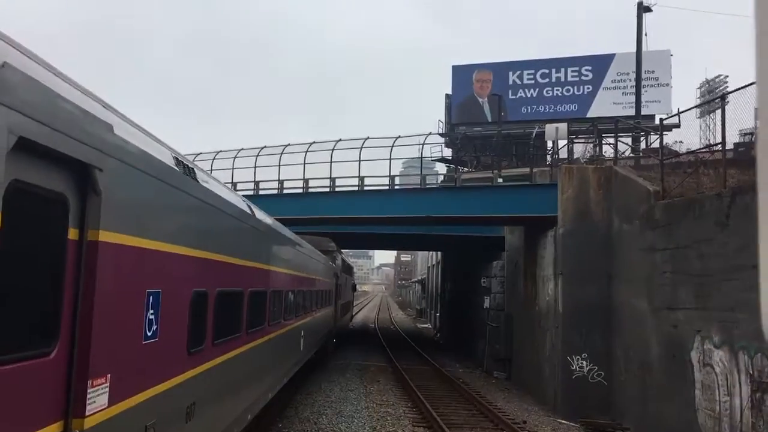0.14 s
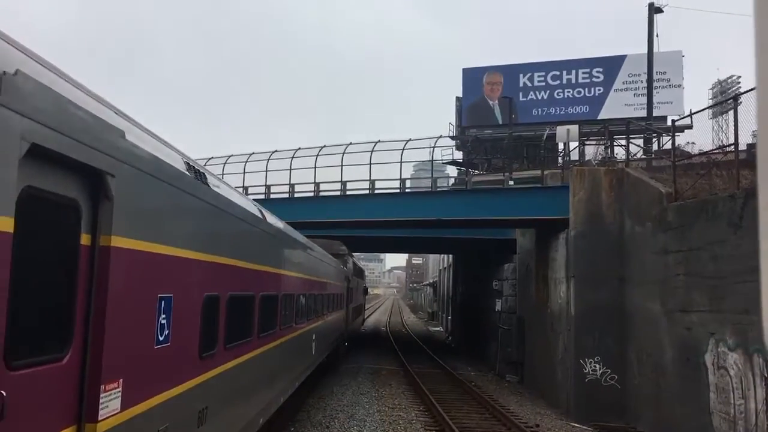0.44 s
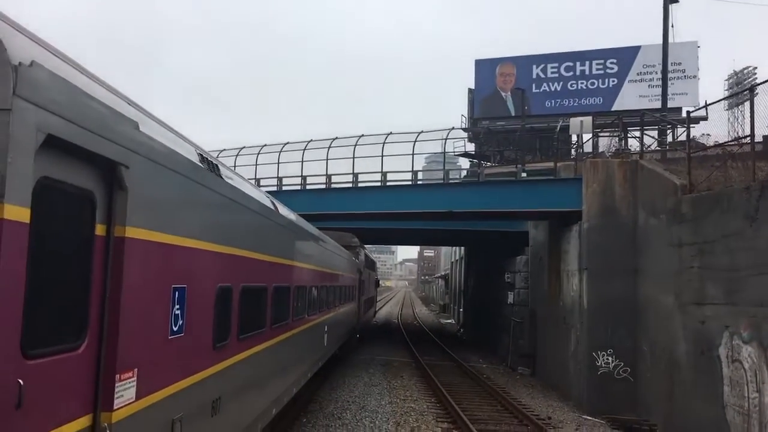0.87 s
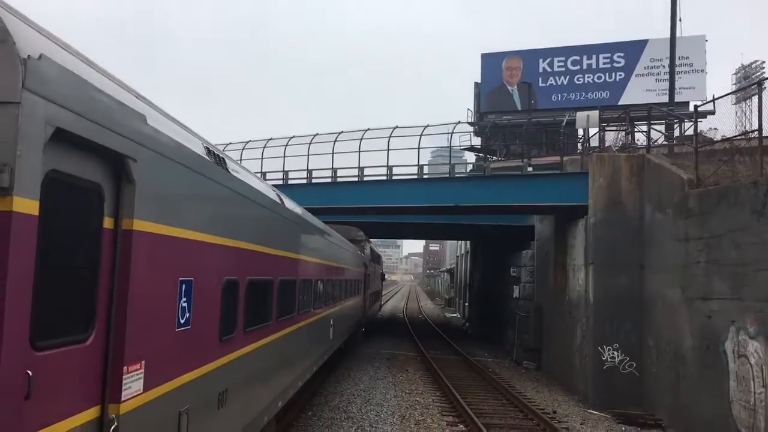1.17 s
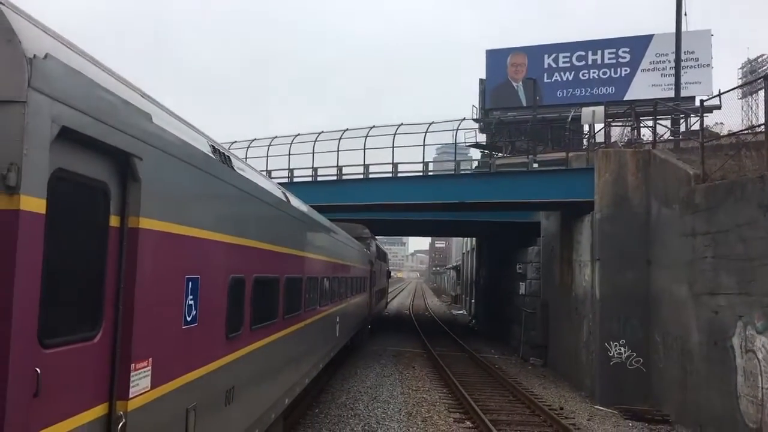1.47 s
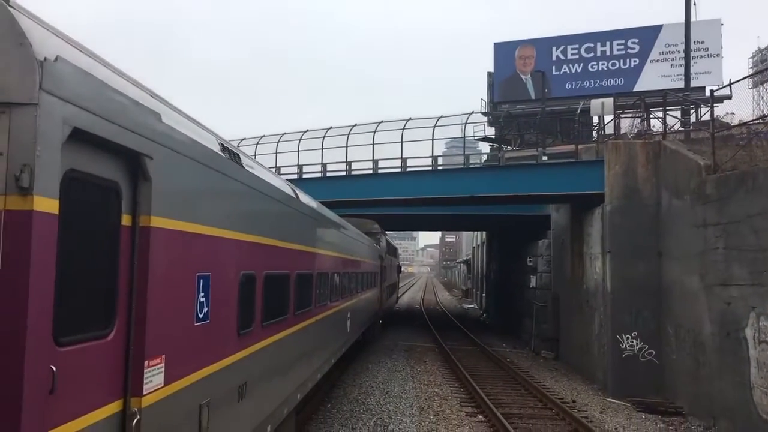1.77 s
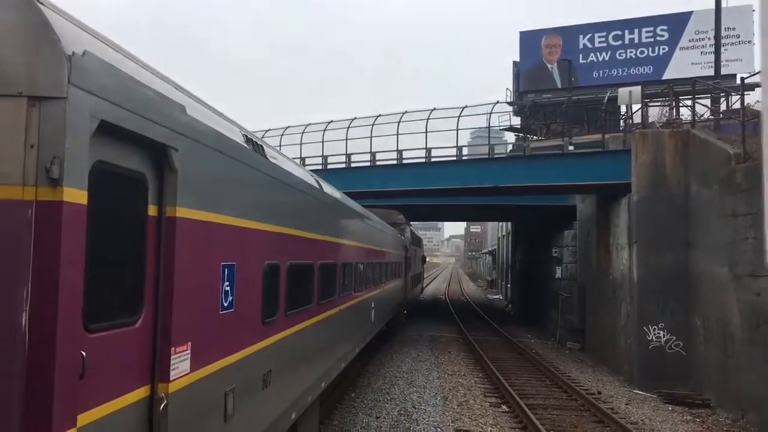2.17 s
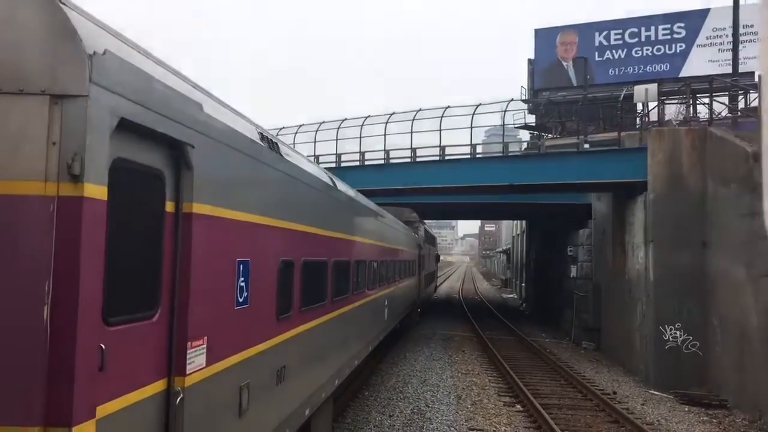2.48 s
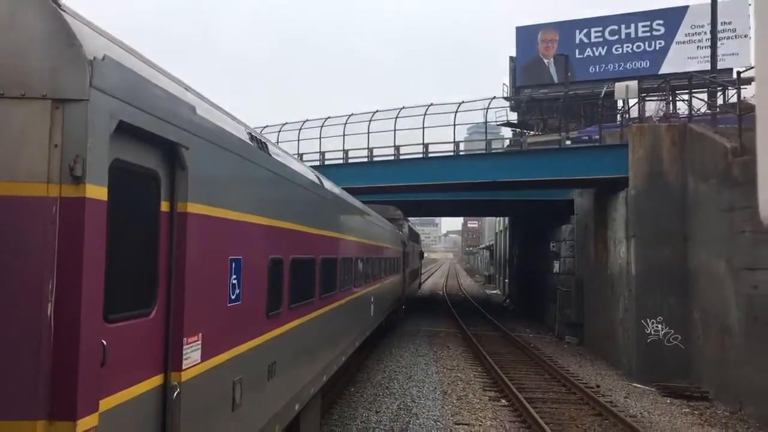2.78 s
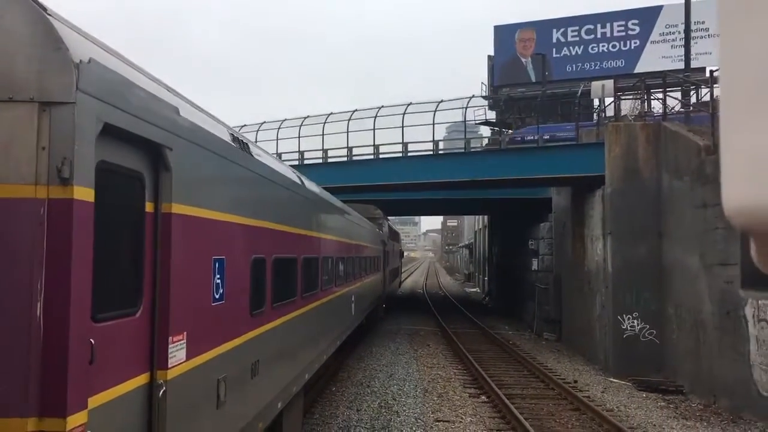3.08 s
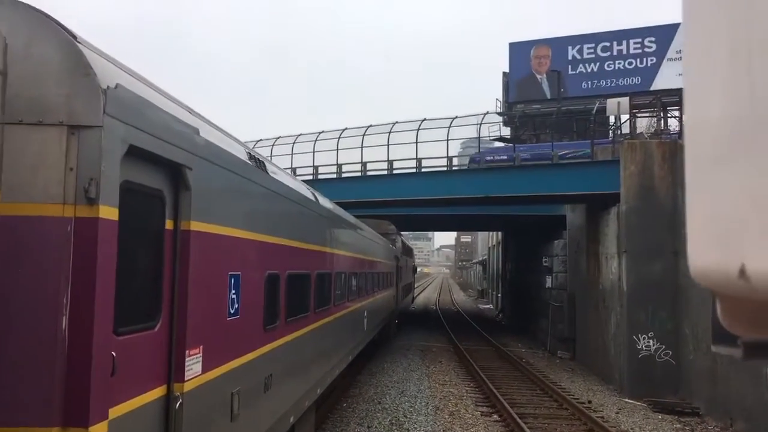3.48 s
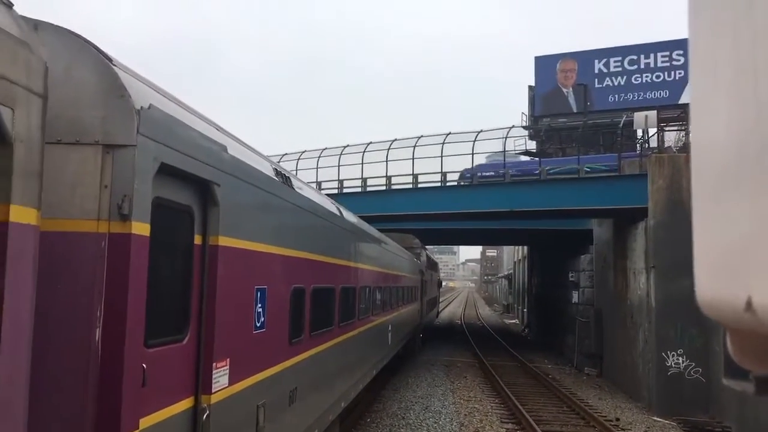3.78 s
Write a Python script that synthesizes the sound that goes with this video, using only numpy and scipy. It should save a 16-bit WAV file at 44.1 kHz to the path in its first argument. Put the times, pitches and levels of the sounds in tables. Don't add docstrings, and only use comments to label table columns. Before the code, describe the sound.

A diesel train rolls with deep engine throb and steady wheel roar; a distant horn stops early, then late on a short high squeal echoes off walls, followed by air spits, heard close outdoors.

```python
import sys
import numpy as np
from scipy import signal
from scipy.fft import rfft, irfft
from scipy.io import wavfile
from scipy.ndimage import uniform_filter1d

SR = 44100
rng = np.random.default_rng(int(sys.argv[2]) if len(sys.argv) > 2 else 0)


def generate_wav(sig):
    pcm = np.round(np.clip(np.atleast_2d(sig).T, -1, 1) * 32767).astype(np.int16)
    wavfile.write(sys.argv[1], SR, pcm)


def undo_db(level):
    steps = np.asarray(level, float) / 20
    return 10 ** steps


N = 173754
T = np.arange(N) / SR

# time_s, firing_hz, level_db
FIRING = [(.1, 58.1, -26), (.22, 58.8, -31.5), (.4, 58.95, -25.5), (1.07, 58.2, -28.5), (1.4, 58.2, -23.5),
          (1.47, 58.35, -34.5), (1.57, 58.6, -20.5), (1.66, 58.44, -33.5), (1.76, 59.1, -21.5),
          (2.2, 60.87, -30), (2.76, 62.6, -33.5), (2.93, 64.05, -20.5), (3.17, 64.6, -32),
          (3.28, 64.14, -20.5), (3.4, 65.3, -39), (3.68, 66.3, -35), (3.88, 67.6, -23), (3.94, 67.3, -33)]
# time_s, depth_db (negative swells), half_width_s
FIRING_LULLS = [(.07, -2, .03), (.42, 6, 0.03), (.51, 4, 0.026), (.66, 2, 0.028), (.83, 8, 0.021),
                (1.06, 4, .04), (1.26, 4, .03), (2.14, 1, .04), (2.3, -3.5, 0.062), (2.54, -7, 0.039),
                (3.72, 10, 0.024)]
# time_s, level_db
FIFTH_ORDER = [(0, -50), (.8, -40), (1.4, -50), (1.85, -37), (2.05, -31.5), (2.35, -35.5), (2.5, -28),
               (2.66, -30), (2.8, -50), (3.03, -35), (3.3, -58), (3.47, -50), (3.56, -34), (3.68, -37),
               (3.88, -31.5), (3.94, -38)]
# firing_multiple, cruise_level_db, wander_db, gain_db_per_hz
SHAFT_ORDERS = [(.5, -43, 1, 2.2), (.75, -49, 3, 0), (.917, -44, 3, 0), (1.083, -42, 3, 0),
                (1.167, -38, 2.5, -.6), (1.5, -44, 2.5, 0), (1.75, -48, 3, 0)]
# freq_hz, density_db_per_hz
RUMBLE_SPECTRUM = [(24, -20), (45, -5), (70, -2.5), (160, -3), (300, -6), (400, -9), (470, -15.5),
                   (700, -25)]
# freq_hz, density_db_per_hz
ROAR_SPECTRUM = [(350, -21.5), (600, -7), (800, -5), (980, 0), (1250, -4), (1850, -7), (2300, -15),
                 (3000, -31.5)]
# freq_hz, density_db_per_hz
FIZZ_SPECTRUM = [(1800, -1.5), (3000, 2.5), (4900, -10), (6500, -16), (8000, -24.5), (10500, -29.5),
                 (12000, -32.5), (15500, -43)]
# time_s, effort_db
EFFORT = [(0, 3), (.36, 3.5), (.55, 0.6), (1.2, 0.7), (1.6, 0.4), (2.4, 0.1), (3.0, 0.6), (3.94, 0.7)]
# centre_hz, width_hz, level_db, effort_share
FAN_WHINES = [(399.4, 13, -54, 2.4), (935, 16.4, -47.5, 0.85), (157.5, 10.7, -49, .1)]
# time_s, pitch_hz, level_db
GEAR_HUM = [(0, 265, -42.5), (.6, 266, -41.5), (.9, 269, -59), (1.5, 268.1, -41), (2.1, 263.3, -46.5),
            (2.5, 263, -38.5), (3.05, 269.8, -46), (3.7, 274.3, -36), (3.94, 271, -47)]
# time_s, pitch_hz, level_db
VALVE_SQUEAL = [
    (2.838, 3880, -62),
    (2.862, 3815, -38),
    (2.885, 3772, -32),
    (2.905, 3755, -34),
    (2.95, 3704, -24),
    (3.016, 3700, -20.5),
    (3.062, 3628, -29),
    (3.13, 3598, -28),
    (3.172, 3605, -50),
]
# time_s, depth_db, half_width_s
VALVE_CATCHES = [(2.912, 5, .005), (2.94, 2, .005), (2.968, 4, .004), (3.032, 10, .004), (3.06, 7, .007),
                 (3.094, 14, .007), (3.112, 8, .004), (3.142, 6, .004)]
# multiple, under_first_db, level_slope, fade_start_s, fade_s
SQUEAL_OVERTONES = [(2, -25, 0.1, 3.075, .09), (3, -28, 0.83, 3.026, .06), (4, -45, 1, 3.3, .03)]
# start_s, rise_s, hold_s, peak_db, fall_db_per_s
AIR_PUFFS = [
    (2.85, 0.099, 0.055, -48, 68),
    (2.98, 0.092, 0.076, -59.5, 20.5),
    (1.56, .9, 1.5, -67, 1.5),
]
# freq_hz, density_db_per_hz
PUFF_SPECTRUM = [(1500, -15), (4000, -3), (6200, 1), (8500, -2.5), (10500, -3), (12000, -5.5),
                 (14000, -12.5), (15700, -20.5)]
# start_s, rise_s, hold_s, peak_db, fall_db_per_s
AIR_SPITS = [
    (2.503, .018, .007, -58, 1500),
    (2.535, .002, .003, -50, 1500),
    (2.545, .003, .005, -52, 650),
    (2.696, .003, .004, -63, 1500),
    (3.8995, .003, .006, -40, 500),
    (3.938, .001, .01, -42, 200),
]
# freq_hz, density_db_per_hz
SPIT_SPECTRUM = [(1500, -8), (3500, 2), (5500, 2), (8500, -5), (12000, -5), (14000, -10), (15700, -13)]
# start_s, length_s, from_hz, to_hz, level_db
THIN_SQUEAKS = [(.94, .1, 11600, 11800, -80), (1.176, .115, 8050, 8750, -67),
                (1.186, .1, 12500, 12900, -72), (1.172, .09, 11850, 12300, -70),
                (1.2, .06, 8150, 7900, -69), (1.27, .05, 8500, 8600, -75), (1.27, .05, 12800, 12800, -78),
                (2.9, .15, 12000, 11900, -64), (3.1, .75, 11900, 11800, -73), (.92, .14, 12200, 12300, -81)]
# start_s, length_s, from_hz, to_hz,
# level_db
FAINT_WHISTLES = [(3.142, .028, 3605, 3615, -35), (3.184, .032, 3610, 3605, -35),
                  (3.245, .055, 3605, 3600, -50), (3.335, .035, 3600, 3625, -48),
                  (3.36, .045, 3640, 3690, -56), (3.0, .13, 3785, 3775, -50), (3.13, .15, 3770, 3790, -52),
                  (.5, .42, 6800, 6790, -79), (3.28, .06, 3780, 3780, -58), (3.36, .15, 3785, 3780, -62),
                  (3.52, .215, 3782, 3778, -56), (3.76, .14, 3785, 3775, -62), (2.93, .23, 3370, 3450, -56)]
REED_HZ = [313.4, 382.8, 468.6]
REED_DB = [-48, -46, -46]
REED_TILT_DB = [-.45, .3, -.9]
# freq_hz, gain_db
BELL_RESPONSE = [(620, -12), (770, -20), (940, 2), (1250, -14), (1880, -3), (3100, -16), (5700, -31),
                 (9000, -47)]
# delay_s, gain_db
WALL_ECHOES = [(.043, -22), (.08, -14), (.115, -21), (.16, -29), (.237, -28)]
# freq_hz, density_db_per_hz
HISS_SPECTRUM = [(9000, -6), (13000, 0), (15700, 0)]
# freq_hz, gain_db
MIC_RESPONSE = [(14, -25), (30, 0), (9300, 0), (10500, -4), (11700, 0.5), (20000, 0)]


def evened(x):
    return x / np.sqrt(np.mean(abs(x) ** 2) + 1e-20)


def read(points, hz):
    f, value = np.transpose(points)
    return np.interp(np.log(hz + 1), np.log(f + 1), value)


def track(points):
    return np.interp(T, *np.transpose(points))


def drift(rate_hz):
    t = T[::128]
    freqs_hz = rate_hz * np.geomspace(.1, 1, 20)
    x = sum(np.sin(2 * np.pi * (f * t + rng.random())) / np.sqrt(f) for f in freqs_hz)
    return np.interp(T, t, evened(x))


def dips(rows):
    return sum(depth_db * np.exp(-((T - s) / width_s) ** 2) for s, depth_db, width_s in rows)


def noise(spectrum, patchy_db, size=1024):
    frames, hz = 4 * N // size + 5, np.fft.rfftfreq(size, 1 / SR)
    real, imag, patches = rng.standard_normal((frames, len(hz), 3)).T
    patches = uniform_filter1d(patches, 10, 0)
    patches = evened(uniform_filter1d(patches, 14, 1))
    octaves_below = np.log2(np.maximum(spectrum[0][0] / (hz + 1), 1))
    octaves_above = np.log2(np.maximum(hz / spectrum[-1][0], 1))
    shape_db = read(spectrum, hz) - 30 * (octaves_below + octaves_above)
    z = (real + 1j * imag) * undo_db(shape_db[:, None] + patchy_db * patches)
    return evened(signal.istft(z, nperseg=size, noverlap=3 * size // 4)[1][:N])


def fuzzy(hz, width_hz):
    r = np.exp(-np.pi * width_hz / SR)
    z = rng.standard_normal(N) + 1j * rng.standard_normal(N)
    z = signal.lfilter([1], np.convolve([1, -r], [1, -r]), z)
    carrier = np.exp(2j * np.pi * np.cumsum(hz * np.ones(N)) / SR)
    return evened((z * carrier).real)


def wavering(hz, rate_hz, waver_db=2.4):
    level = undo_db(waver_db * drift(rate_hz))
    phase = 2 * np.pi * np.cumsum(hz) / SR + 0.56 * drift(rate_hz)
    return np.sqrt(2) * level * np.sin(phase)


def engine():
    cruise_hz = 64
    s, hz, firing_db = np.transpose(FIRING)
    hz = np.interp(T, s, hz)
    turns = 2 * np.pi * np.cumsum(hz) / SR
    out = undo_db(np.interp(T, s, firing_db) - dips(FIRING_LULLS)) * np.sin(turns)
    out = out + undo_db(track(FIFTH_ORDER)) * np.sin(turns * 5 / 4)
    for k, db, wander_db, gain_db in SHAFT_ORDERS:
        level_db = db + gain_db * (hz - cruise_hz) + wander_db * drift(2.53)
        phase = k * turns + 2 * np.pi * rng.random() + 0.58 * drift(1.57)
        out = out + undo_db(level_db) * np.sin(phase)
    return np.sqrt(2) * out


def rolling():
    rumble_db, roar_db, fizz_db = -34, -32.5, -49.5
    roar_share, fizz_share = 0.21, 1
    effort_db = track(EFFORT)
    out = undo_db(rumble_db + .8 * drift(4.5)) * noise(RUMBLE_SPECTRUM, 1.2, size=4096)
    out = out + undo_db(roar_db + roar_share * effort_db + 0.73 * drift(6.5)) * noise(ROAR_SPECTRUM, 0.66)
    out = out + undo_db(fizz_db + fizz_share * effort_db + 1.0 * drift(9.5)) * noise(FIZZ_SPECTRUM, 0.94)
    for hz, width_hz, db, share in FAN_WHINES:
        out = out + undo_db(db + share * effort_db) * fuzzy(hz, width_hz)
    return out


def hum():
    s, hz, db = np.transpose(GEAR_HUM)
    hz = np.interp(T, s, hz)
    return undo_db(np.interp(T, s, db)) * (.6 * wavering(hz, 9) + .7 * fuzzy(hz, 22))


def squeal():
    flutter_db, shake_hz = .8, 5
    s, hz, db = np.transpose(VALVE_SQUEAL)
    turns = 2 * np.pi * np.cumsum(np.interp(T, s, hz) + shake_hz * drift(60)) / SR
    level_db = np.interp(T, s, db, -150, -150) - dips(VALVE_CATCHES)
    top_db = db.max()
    out = undo_db(level_db + flutter_db * drift(70)) * np.sin(turns)
    loud_enough = np.clip((level_db + 46.5) / 14, 0, 1)
    for k, under_db, steep, stop_s, fade_s in SQUEAL_OVERTONES:
        gate = loud_enough * np.clip((stop_s - T) / fade_s + 1, 0, 1) ** 2
        overtone_db = top_db + under_db + steep * (level_db - top_db) + 2.8 * drift(80)
        out = out + gate * undo_db(overtone_db) * np.sin(round(k) * turns)
    return np.sqrt(2) * out


def cutting(x):
    tail_db, tail_t60_s, dull_hz = -16, .75, 5000
    taps = np.zeros(SR)
    at = np.arange(800, SR - 40, 40) + rng.integers(0, 40, (SR - 801) // 40)
    taps[at] = rng.choice([-1., 1.], len(at)) * undo_db(-60 * at / SR / tail_t60_s)
    taps = undo_db(tail_db) * taps / np.linalg.norm(taps)
    for s, db in WALL_ECHOES:
        taps[round(s * SR)] += undo_db(db)
    taps = signal.lfilter(*signal.butter(2, dull_hz, fs=SR), taps)
    return x + signal.fftconvolve(x, taps)[:N]


def puffs(rows, spectrum, sputter_db):
    shape = 0
    for s, rise_s, hold_s, db, fall in rows:
        falling_s = np.maximum(T - s - rise_s - hold_s, 0)
        shape = shape + np.clip((T - s) / rise_s, 0, 1) ** 2 * undo_db(db - fall * falling_s)
    return shape * undo_db(sputter_db * drift(150)) * noise(spectrum, 1.4, size=256)


def air():
    return puffs(AIR_PUFFS, PUFF_SPECTRUM, .8) + puffs(AIR_SPITS, SPIT_SPECTRUM, 1.2)


def glide(s, length_s, from_hz, to_hz):
    u = np.clip((T - s) / length_s, 0, 1)
    return from_hz + (to_hz - from_hz) * u, np.sin(np.pi * u) ** .5


def squeaks():
    blur_share = .04
    out = 0
    for s, length_s, from_hz, to_hz, db in THIN_SQUEAKS:
        hz, shape = glide(s, length_s, from_hz, to_hz)
        out = out + undo_db(db + 2.5 * drift(60)) * shape * fuzzy(hz, blur_share * from_hz)
    for s, length_s, from_hz, to_hz, db in FAINT_WHISTLES:
        hz, shape = glide(s, length_s, from_hz, to_hz)
        out = out + undo_db(db) * shape * wavering(hz, 30, waver_db=1.1)
    return out


def horn():
    stop_s, fall_db_per_s, waver_db = 0.41, 95, 2
    blur_rad = .035
    t, out = T[:SR], np.zeros(N)
    for hz, db, tilt_db in zip(REED_HZ, REED_DB, REED_TILT_DB):
        for k in range(1, int(9000 / hz) + 1):
            level_db = db + tilt_db * k + read(BELL_RESPONSE, k * hz) + waver_db * drift(10.3)[:SR]
            wobble = (.2 + blur_rad * k) * drift(13.14)[:SR]
            out[:SR] += undo_db(level_db) * np.sin(2 * np.pi * (k * hz * t + rng.random()) + wobble)
    return np.sqrt(2) * out * undo_db(-fall_db_per_s * np.maximum(T - stop_s, 0))


def scene():
    train = engine() + rolling() + hum()
    brake = cutting(squeal()) + air() + squeaks()
    return (train + brake + horn())[None]


def top_cut(x):
    return signal.sosfilt(signal.butter(12, 15670, fs=SR, output="sos"), x)


def record(dry):
    hiss = undo_db(-86) * noise(HISS_SPECTRUM, .5, size=512)
    response = undo_db(read(MIC_RESPONSE, np.fft.rfftfreq(N, 1 / SR)))
    heard = irfft(rfft(dry + hiss) * response, N)
    return top_cut(heard)


dry = scene()
out = record(dry)
generate_wav(out)
```